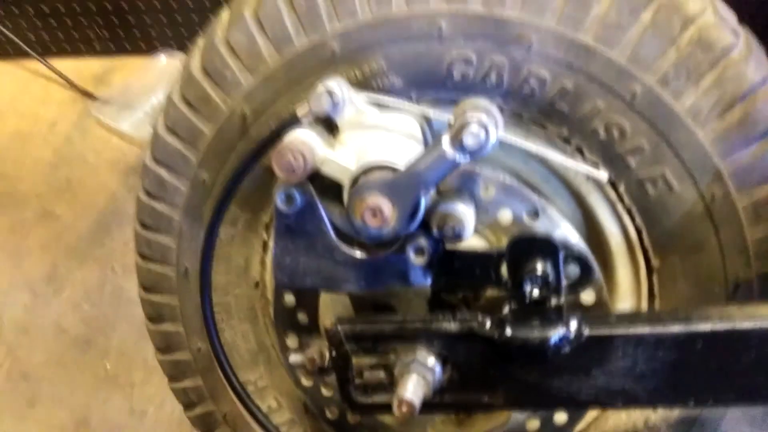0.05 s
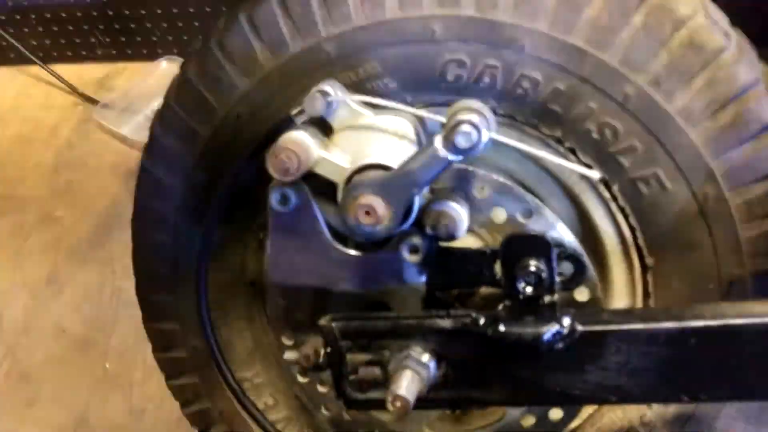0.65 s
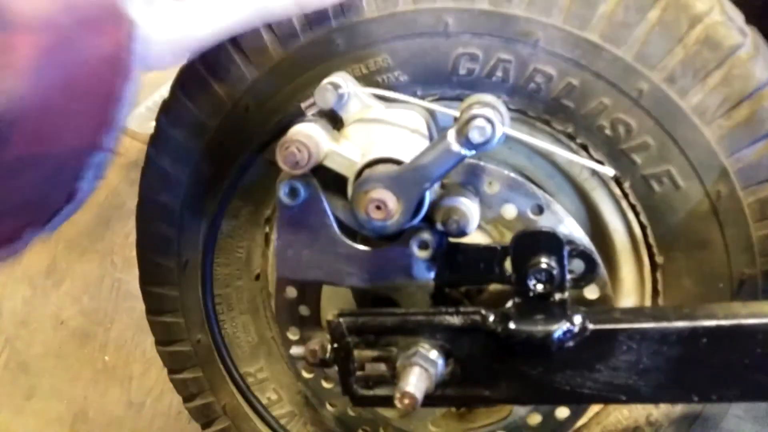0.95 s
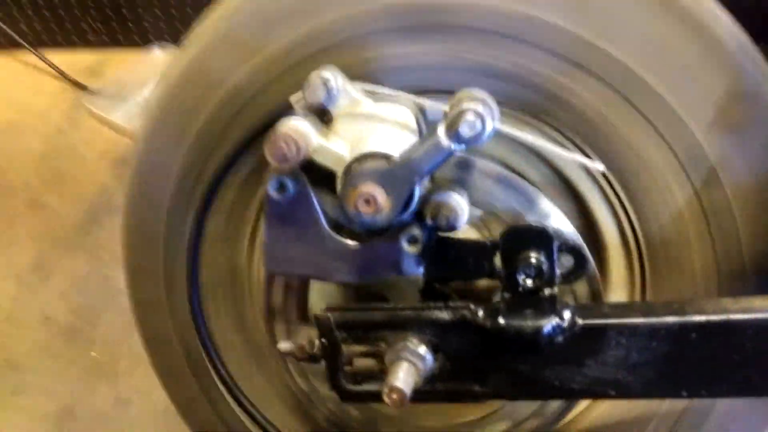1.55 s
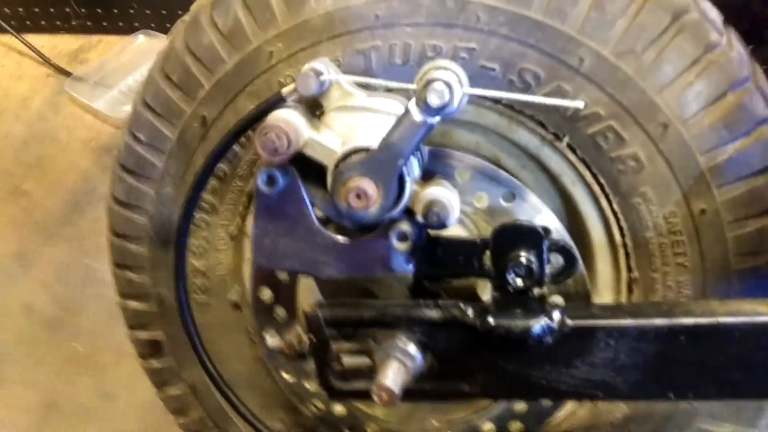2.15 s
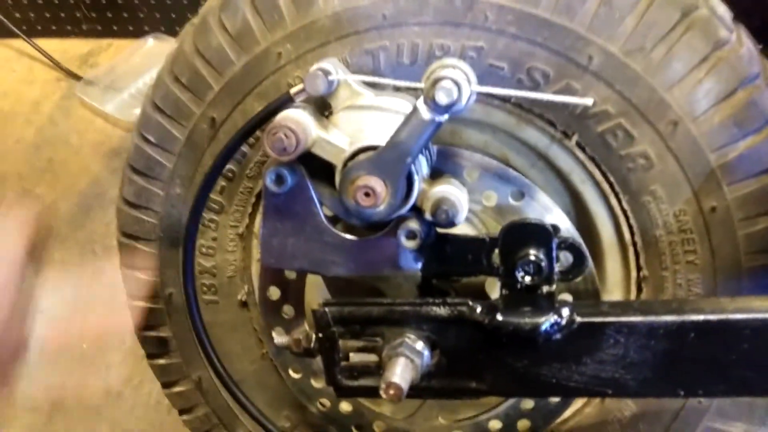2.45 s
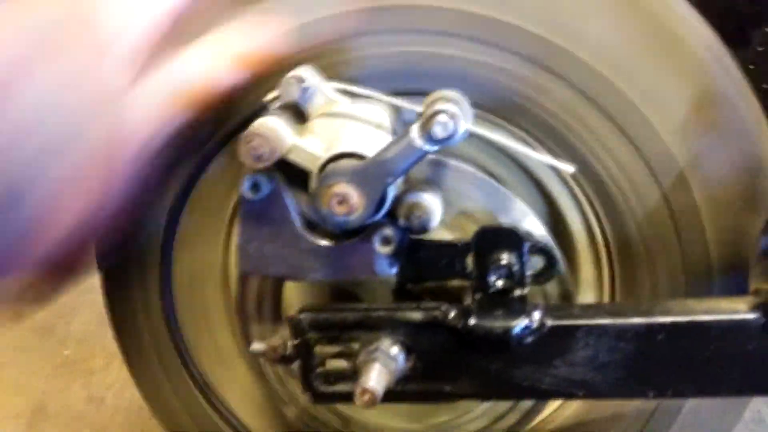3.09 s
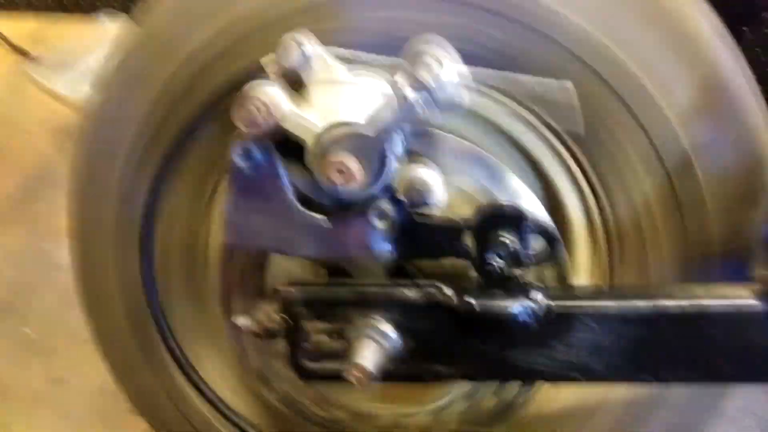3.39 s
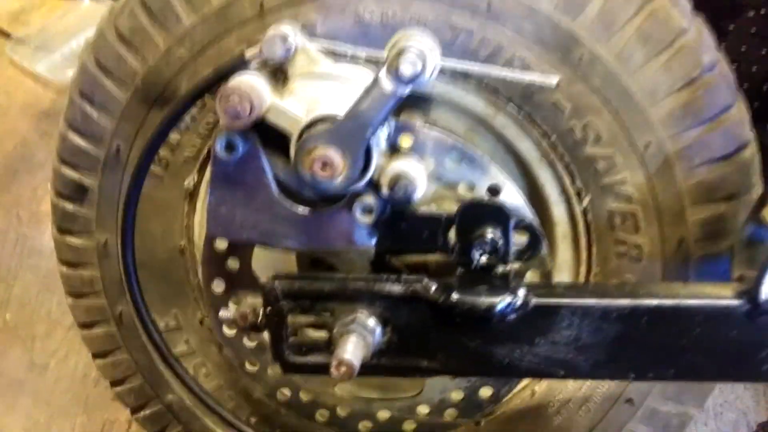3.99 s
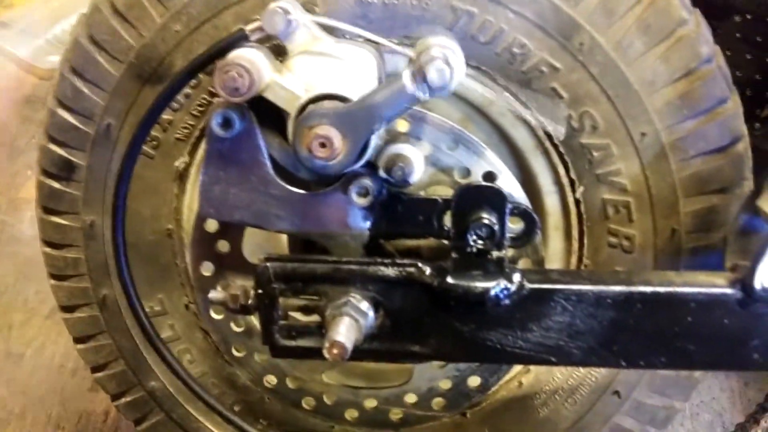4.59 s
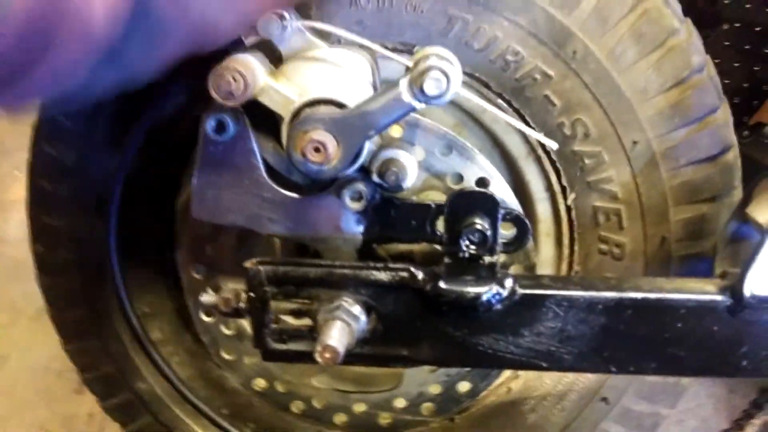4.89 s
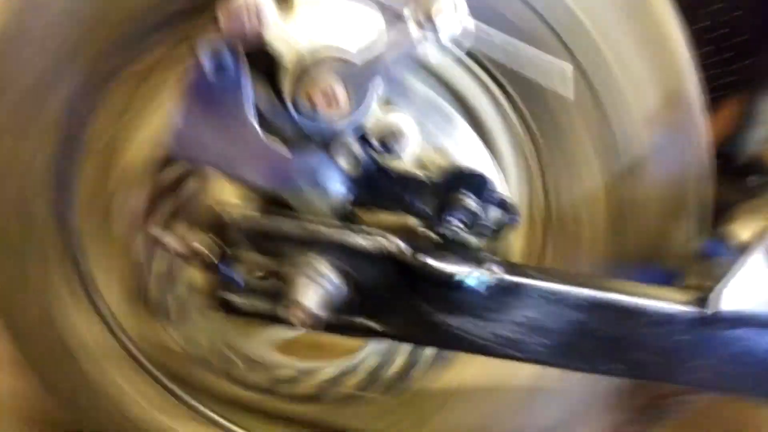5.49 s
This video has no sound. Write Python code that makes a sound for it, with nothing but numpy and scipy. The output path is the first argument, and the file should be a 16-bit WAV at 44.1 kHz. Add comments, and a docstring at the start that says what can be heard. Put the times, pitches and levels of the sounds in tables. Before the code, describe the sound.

Close up in a quiet workshop, a disc brake's loose metal lever clacks twice and ticks. A small wheel is spun by hand three times, its hub rolling softly while the steel disc brushes the pads with a thin ring. Dull knocks, hollow taps, short scuffs and sleeve swishes come in between. Near the end the caliper gives one hard, bright clank.

```python
"""A cable disc brake works on a small wheel, spun by hand three times in a workshop, near the microphone.
Impacts excite the metal's damped modes: the loose lever arm clacks and rattles, the caliper clanks once,
hard. Friction drives the steel disc, which brushes its pads and sings over the rolling hub.
Between these come dull knocks of the frame, hollow taps, scuffs on tyre and floor, and a sleeve's swish.
A short reverberation and quiet air lie behind them."""
import sys
import numpy as np
from scipy import signal
from scipy.io import wavfile
from scipy.ndimage import uniform_filter1d

SR = 44100
rng = np.random.default_rng(int(sys.argv[2]) if len(sys.argv) > 2 else 0)


def to_wav(s):
    """Save 16-bit WAV."""
    ch = np.atleast_2d(s).T  # columns
    pcm = np.round(np.clip(ch, -1, 1) * 32767)  # PCM
    wavfile.write(sys.argv[1], SR, pcm.astype(np.int16))


N = 248500
TIME = np.arange(N) / SR
HIT_TIME = TIME[:SR // 3]
LN_1000 = np.log(1000)  # amplitude decay of 60 dB, in nepers

# The lever arm hits its stop: start_s, level_db, rebound_s, tilt_db_per_octave, ring_db
LEVER_CLACKS = [(.6338, -26, .0047, 1.5, 8.5), (.7708, -36.5, .012, 6, 13.5)]
# Light metallic ticks, rung with the lever's modes: start_s, level_db, tilt_db_per_octave, ring_db
LEVER_TICKS = [(.6683, -46.5, 10, -6), (0.8188, -44.5, -1.5, 1), (.8394, -46, 15, -12), (.884, -52, 0, 9),
               (0.895, -49, 4, -10), (0.95, -52, 3, -1), (1.046, -52, 4.5, -4), (1.096, -51.5, -5.5, -2),
               (1.125, -55.5, 12, -5), (2.01, -47, 11, -14), (3.311, -40, 4.5, -1), (4.294, -55.5, 1, -19)]
# Distinct modes of the lever: pitch_hz, level_db, base_t60_s
LEVER_MODES = [(312, -19, .1), (845, -18, .13), (1290, -11, .1), (1400, -7, .1), (1475, -7, .12),
               (1750, -9, .1), (1798, 4, .07), (1850, -6, .07), (2088, -7, .1), (2196, -11, .1),
               (2368, -5, .1), (2565, -12, .12), (3127, -14, .1), (3180, -14, .1), (3350, -14, .12),
               (3830, -13, .1), (3967, -13, .1), (4130, -11, .11), (4382, -4, .08), (4746, -7, .12),
               (4266, -12, .08), (5114, -16, .09)]
# Spectrum of its dense, short-lived modes: frequency_hz, density_db
LEVER_SPECTRUM = [(60, -33), (170, -27), (280, -0.5), (520, -11), (800, -0.5), (1050, -3.5), (1450, 2),
                  (1900, -1), (2900, -4), (3550, -4.5), (4400, -6.5), (6000, -13.5), (8000, -15.5),
                  (10500, -28), (15500, -29)]


def lever_arm(tick_contact_s=.0052):
    """Impact across a clearance: the loose arm strikes its stop, rebounds and rattles."""
    clacks = rebounds(LEVER_CLACKS, count=2, contact_share=.55, softening=.83,
                      level_step_db=.5, tilt_step_db=-3, ring_step_db=-.5)
    ticks = [(s, db, tick_contact_s, tilt_db, ring_db) for s, db, tilt_db, ring_db in LEVER_TICKS]
    return strikes(clacks + lead_in_clicks(LEVER_CLACKS) + ticks, LEVER_SPECTRUM, LEVER_MODES,
                   grain_db=2.5, damping=1.84, rattle_db=-26, rattle_s=.065, blur_hz=11)


# The caliper slams against its bracket: start_s, level_db, rebound_s, tilt_db_per_octave, ring_db
CALIPER_CLANKS = [(5.355, -25, .0065, 1, 8)]
# Distinct modes of the caliper: pitch_hz, level_db, base_t60_s
CALIPER_MODES = [(742, -1, .16), (1125, -10, .12), (1609, -14, .12), (1860, -10, .08), (2046, -6, .13),
                 (2115, 0, .12), (4130, -14, .18), (4700, -11, .15), (5182, -8, .1), (5334, -5, .15),
                 (5679, -9, .17), (6400, -13, .11), (6917, -3, .12), (7307, -3, .14), (7477, -6, .19),
                 (7850, -1, .14), (8053, -11, .12), (8146, -7, .15), (9275, -6, .09), (9404, -8, .09),
                 (9776, -7, .12), (9974, -2, .11), (10740, -12, .12), (11272, -13, .1), (13662, -10, .09),
                 (13883, -13, .09)]
# Spectrum of its dense, short-lived modes: frequency_hz, density_db
CALIPER_SPECTRUM = [(60, -30), (160, -17), (250, -13.5), (520, -12), (760, -0.5), (1300, -6.5), (2050, 6.5),
                    (2700, -17), (3500, -11.5), (5000, -1.5), (6200, -7), (7700, -7.5), (11000, -9),
                    (15500, -16)]


def caliper_clank():
    """Inelastic rebound: the caliper lands three times, each slower blow staying longer in contact."""
    clanks = rebounds(CALIPER_CLANKS, count=3, contact_share=.29, softening=1.55,
                      level_step_db=-.14, tilt_step_db=-.18, ring_step_db=-2)
    return strikes(clanks + lead_in_clicks(CALIPER_CLANKS), CALIPER_SPECTRUM, CALIPER_MODES,
                   grain_db=5, damping=1.7, rattle_db=-36, rattle_s=.012, blur_hz=19)


# The disc catches on a pad: start_s, level_db, tilt_db_per_octave, ring_db
DISC_CATCHES = [(1.43, -49, 1.5, -5), (1.532, -49, 9, 9.5), (3.404, -50.5, 7, 12), (3.542, -36.5, -2, -15),
                (3.563, -39, -1, -15), (3.692, -54, -1, -10), (5.314, -58, 2, 8.5), (5.492, -50.5, 5.5, 6)]
# Distinct modes of the steel disc: pitch_hz, level_db, base_t60_s
DISC_MODES = [(1614, -7, .15), (2928, -3, .42), (3294, -11, .15), (3811, -10, .15), (4242, -4, .15),
              (4350, -6, .12), (5361, -7, .2), (5700, -3, .22), (5964, -13, .15), (6700, -8, .1),
              (6772, -1, .16), (7428, -11, .25), (8400, -12, .1), (8990, -9, .1), (9280, 1, .17),
              (9400, -5, .08), (9905, -13, .1), (10740, -11, .09), (11300, -13, .07), (11455, -9, .08),
              (12338, -13, .1), (12850, -16, .08), (13199, -14, .1), (13720, -9, .08), (14650, -14, .08)]
# Spectrum of its dense, short-lived modes: frequency_hz, density_db
DISC_SPECTRUM = [(300, -26.5), (1500, -8), (4000, 1), (6500, 0), (7800, -2), (9400, 0.5), (10400, -1),
                 (11300, -0.5), (13700, -7), (15800, -6.5)]


def disc_pings(contact_s=.0036):
    """Free vibration of a plate: a brief catch on a pad leaves the disc ringing."""
    catches = [(s, db, contact_s, tilt_db, ring_db) for s, db, tilt_db, ring_db in DISC_CATCHES]
    return strikes(catches, DISC_SPECTRUM, DISC_MODES,
                   grain_db=7, damping=1.33, rattle_db=-29, rattle_s=.012, blur_hz=30.8)


def disc_friction(pressure, firm_db=-47, damping=1.8):
    """Forced vibration: friction at the pads makes a brushing noise and drives the disc's resonances."""
    brush = colour(grit(N, grain_db=4.5, grain_s=.0015) * pressure, DISC_SPECTRUM)
    drive = grit(N, grain_db=5.3, grain_s=.006) * pressure
    sing = np.zeros(N)
    total = np.linalg.norm([amp(db) for _, db, _ in DISC_MODES])
    for hz, db, t60 in DISC_MODES:
        treble_bias = np.clip(.091 * np.log2(hz / 4000), -.5, .4)
        touch = (pressure / amp(firm_db) + 1e-6) ** -treble_bias  # a light touch favours high modes
        turn = unit(amp(7 * np.tanh(wander(per_s=20))))  # modes take turns as the contact point moves
        pole = np.exp((2j * np.pi * hz - LN_1000 * damping / t60) / SR)
        input_gain = np.sqrt(2 - 2 * abs(pole) ** 2)
        mode = signal.lfilter([input_gain], [1, -pole], drive * touch * turn + 1e-12).real
        sing += amp(db) / total * mode
    return brush + sing


# The wheel runs after a push: start_s, hold_s, level_db
WHEEL_SPINS = [(1.304, 0.31, -61.5), (3.087, 0.53, -55), (5.134, 0.71, -56)]
# The warped disc presses on the pads, about once a turn: start_s, hold_s, level_db, release_s
PAD_RUBS = [(1.388, 0.049, -69, 0.011), (1.51, 0.28, -71, .05), (3.08, 0.092, -57.5, 0.01),
            (3.4, 0.14, -48.5, 0.062), (5.163, 0.051, -46, 0.011), (5.497, 0.026, -51.5, 0.058)]
# Rolling noise of the hub: frequency_hz, density_db
HUB_SPECTRUM = [(100, -34.5), (240, -1.5), (480, -6), (640, -6.5), (810, 6.5), (1000, -2), (1400, -6.5),
                (1620, 3.5), (2200, -10), (4000, -34), (8000, -49)]


def spinning_wheel(drag_db=-3.5):
    """Rolling and sliding contact: the hub rolls while the pads drag lightly, harder at the warp."""
    rolling = sum(amp(db) * held(s, hold_s, attack_s=.089, release_s=.16)
                  for s, hold_s, db in WHEEL_SPINS)
    warp = sum(amp(db) * held(s, hold_s, attack_s=.013, release_s=release_s)
               for s, hold_s, db, release_s in PAD_RUBS)
    disc = disc_friction(pressure=amp(drag_db) * rolling + warp)
    hub = colour(grit(N, grain_db=2.9, grain_s=.0038) * rolling, HUB_SPECTRUM)
    return amp(-4) * disc + amp(-2) * hub


# Blows on the frame: start_s, level_db, rebound_s, tilt_db_per_octave, ring_db
FRAME_KNOCKS = [(2.022, -51.5, 0.0076, -7.5, -3), (2.074, -46.5, 0.0066, 3.5, -9.5),
                (2.644, -40, 0.0064, 3.5, -6), (3.181, -47, 0.0044, -8.5, -9.5),
                (3.271, -33.5, .01, -5, -14), (3.541, -35.5, 0.017, 3, 1.5), (3.696, -44, 0.01, -5.5, -16),
                (4.200, -38, .016, -1.5, -9), (4.510, -43.5, 0.008, -1, -1.5),
                (4.561, -37, 0.0086, 2.5, -12), (5.139, -35.5, 0.0098, 1, -2.5),
                (5.19, -41, 0.017, -1.5, -4)]
# Distinct modes of the frame: pitch_hz, level_db, base_t60_s
FRAME_MODES = [(247.7, -5.5, 0.23), (454, -5.5, 0.25), (474, -24, .1), (784, -28, .11), (806.5, 7.5, .11),
               (945, 1.5, 0.11), (1400, -17, 0.11), (1895, -8.5, 0.14)]
# Spectrum of its dense, short-lived modes: frequency_hz, density_db
FRAME_SPECTRUM = [(40, -30), (100, -28), (160, -25), (225, -5), (500, -7.5), (830, 2.5), (1150, -3.5),
                  (1700, -6), (2500, -19), (4500, -26.5), (9000, -42), (15000, -57)]


def frame_knocks():
    """Impact on a body with low modes: each blow and its weaker rebound sound dull."""
    knocks = rebounds(FRAME_KNOCKS, count=2, contact_share=.46, softening=1.36,
                      level_step_db=-3.5, tilt_step_db=2.5, ring_step_db=2)
    return strikes(knocks, FRAME_SPECTRUM, FRAME_MODES,
                   grain_db=-.5, damping=.76, rattle_db=-24, rattle_s=.012, blur_hz=6.8)


# Light hollow taps: time_s, level_db, pitch_hz
HOLLOW_TAPS = [(0.039, -43, 970), (1.014, -37.5, 741), (2.797, -36.5, 905), (3.074, -38, 820),
               (3.140, -38, 830), (3.162, -34, 366), (4.717, -45, 800), (4.752, -41, 815),
               (4.867, -34, 854)]


def hollow_taps(gain_db=-4, rise_s=.00219, knock_db=-7):
    """Heavily damped oscillation: a soft tap gives only a few cycles of a hollow note."""
    out, t = np.zeros(N), HIT_TIME
    envelope = (t / rise_s * np.exp(1 - t / rise_s)) ** 2
    for s, db, hz in HOLLOW_TAPS:
        note = np.sin(2 * np.pi * hz * t)
        knock = amp(knock_db) * colour(rng.standard_normal(len(t)), FRAME_SPECTRUM)
        add(out, s - rise_s / 2, amp(db + gain_db) * (note + knock) * envelope)
    return out


# Scuffs on tyre and floor: peak_s, level_db, width_s, tilt_db_per_octave
SCUFF_STROKES = [(1.42, -52.5, 0.054, -4.5), (2.019, -42.5, 0.058, 2), (2.643, -47.5, .065, -.5),
                 (3.14, -54, .14, 1), (3.37, -43.5, .11, 0.5), (3.577, -44.5, .075, -5),
                 (4.566, -46, .07, 1.5), (5.184, -40.5, 0.047, -2.5), (5.474, -46, 0.097, -1)]
# Their rubbing noise: frequency_hz, density_db
SCUFF_SPECTRUM = [(47, -92), (80, -38.5), (747, -5), (852, -7), (993, 3.5), (1080, -6.5), (1320, 2.5),
                  (1610, -14), (1870, -4), (2330, -13.5), (2490, -7.5), (3460, -19), (15000, -41.5)]


def scuffs():
    """Sliding friction: short rubs on tyre and floor give bursts of midrange noise."""
    return strokes(SCUFF_STROKES, SCUFF_SPECTRUM, rise_share=.56, grain_db=0, grain_s=.0027)


# Passes of the sleeve: peak_s, level_db, width_s
SLEEVE_PASSES = [(0.208, -64, 0.25), (2.679, -58, 0.095), (2.794, -58.5, 0.045), (2.88, -62.5, 0.053),
                 (3.021, -53.5, 0.041), (3.176, -52.5, 0.058), (4.776, -55.5, 0.081), (4.949, -53.5, 0.085)]
# Rubbing noise of the cloth: frequency_hz, density_db
SLEEVE_SPECTRUM = [(240, -22), (400, -6.5), (791, 2), (1590, -4.5), (1740, -4.5), (4130, -6.5), (6710, -12),
                   (9230, -11), (15000, -24)]


def sleeve_swishes(tilt_db=1.94):
    """Friction of cloth: every pass gives broadband noise of the same shape and colour."""
    passes = [(s, db, width_s, tilt_db) for s, db, width_s in SLEEVE_PASSES]
    return strokes(passes, SLEEVE_SPECTRUM, rise_share=.48, grain_db=1, grain_s=.002)


# Reverberation time of the workshop: frequency_hz, t60_s
ROOM_DECAY = [(150, 0.5), (800, 0.26), (2500, 0.15), (7000, 0.15), (15000, 0.069)]


def workshop_reverb(x, build_s=.0091):
    """Diffuse reverberation: reflections build up quickly and die soonest in the treble."""
    t = HIT_TIME
    hz, when, bands = signal.stft(rng.standard_normal(len(t)), SR, nperseg=256)
    decay = np.exp(-LN_1000 * when / read(ROOM_DECAY, hz)[:, None])
    tail = signal.istft(bands * decay, SR, nperseg=256)[1][:len(t)]
    tail *= 1 - np.exp(-(t / build_s) ** 2)
    return signal.fftconvolve(x, tail / np.linalg.norm(tail))[:N]


# Background noise of the room: frequency_hz, density_db
AIR_SPECTRUM = [(15, -79), (25, -28), (107, -22.5), (179, -16), (361, -5), (500, -5), (620, -4), (672, -2),
                (729, -2.5), (857, -4.5), (1280, -5), (1430, -7.5), (2460, -9.5), (2660, -11), (15800, -22)]


def room_air(level_db=-62):
    """Stationary noise: the room's air is a faint, steady hush."""
    return amp(level_db) * colour(rng.standard_normal(N), AIR_SPECTRUM)


def strikes(rows, spectrum, modes, grain_db, damping, rattle_db, rattle_s, blur_hz):
    """Modal superposition: parts chatter as they meet, then each mode rings with t60 = base / damping."""
    out, t = np.zeros(N), HIT_TIME
    hz, mode_db, t60 = np.transpose(modes)[:, :, None]
    decay = np.exp(-LN_1000 * t * damping / t60)
    for s, db, contact_s, tilt_db, ring_db in rows:
        progress = t / contact_s
        onset = 1 - np.exp(-2 * progress)
        blow = np.sqrt(2 * progress) * np.exp(.5 - progress)
        rattle = amp(rattle_db) * onset * np.exp(-t / rattle_s)
        chatter = colour(grit(len(t), grain_db, grain_s=.0004) * (blow + rattle), spectrum, tilt_db)
        weight = amp(mode_db + tilt_db * np.log2(hz))  # a harder blow favours the high modes
        phase = 2 * np.pi * rng.random(hz.shape)  # every blow lands on another spot
        # play in the joints blurs the notes: a random walk of phase
        drift = np.cumsum(rng.standard_normal(len(t))) * np.sqrt(2 * np.pi * blur_hz / SR)
        drift = uniform_filter1d(drift, size=120) * rng.choice([-1, 1], hz.shape)
        ring = (weight * decay * np.sin(2 * np.pi * hz * t + phase + drift)).sum(0)
        add(out, s, amp(db) * (chatter + amp(ring_db) * onset * ring / np.linalg.norm(weight)))
    return out


def rebounds(rows, count, contact_share, softening, level_step_db, tilt_step_db, ring_step_db):
    """Repeated impact: each hit lands count times, stepping in strength, contact time and colour."""
    return [(s + k * gap_s, db + k * level_step_db, contact_share * gap_s * softening ** k,
             tilt_db + k * tilt_step_db, ring_db + k * ring_step_db)
            for s, db, gap_s, tilt_db, ring_db in rows for k in range(count)]


def lead_in_clicks(rows, lead_s=.0034, softer_db=15, width_s=.0014, ring_db=-10):
    """A faint, short click sounds about 3 ms before each loud hit."""
    return [(s - lead_s, db - softer_db, width_s, tilt_db, ring_db) for s, db, _, tilt_db, _ in rows]


def strokes(rows, spectrum, rise_share, grain_db, grain_s):
    """Friction noise: each stroke swells and fades exponentially, brighter for a higher tilt."""
    out = np.zeros(N)
    for s, db, width_s, tilt_db in rows:
        swell = held(s, 0, attack_s=rise_share * width_s, release_s=(1 - rise_share) * width_s)
        heard = np.flatnonzero(swell > .003)
        friction = grit(len(heard), grain_db, grain_s) * swell[heard]
        add(out, TIME[heard[0]], amp(db) * colour(friction, spectrum, tilt_db))
    return out


def grit(count, grain_db, grain_s):
    """Stick-slip noise: as surfaces catch and slip, the strength jumps from grain to grain."""
    grain = (TIME[:count] / grain_s).astype(int)
    noise = rng.standard_normal(count)
    strength = amp(grain_db * rng.standard_normal(count).clip(-2, 2))
    return unit(noise * strength[grain])


def colour(x, spectrum, tilt_db=0, size=4096):
    """Minimum-phase filtering at unit power: the spectrum, tilted by tilt_db an octave above 500 Hz."""
    hz = abs(np.fft.fftfreq(size, 1 / SR))
    gain = unit(amp(read(spectrum, hz) + tilt_db * np.log2(np.maximum(hz, 500))))
    log_response = signal.hilbert(np.log(gain + 1e-5)).conj()
    impulse = np.fft.ifft(np.exp(log_response)).real
    return signal.fftconvolve(x, impulse[:size // 2])[:len(x)]


def held(s, hold_s, attack_s, release_s):
    """Exponential envelope: it rises until s, holds, and dies away."""
    return np.exp(-np.maximum(s - TIME, 0) / attack_s - np.maximum(TIME - s - hold_s, 0) / release_s)


def wander(per_s):
    """Random modulation: straight lines join per_s random values a second."""
    knots = np.arange(0, TIME[-1] + 1, 1 / per_s)
    return np.interp(TIME, knots, rng.standard_normal(len(knots)))


def read(points, hz):
    """Interpolation of a table along a logarithmic frequency axis."""
    table_hz, value = np.transpose(points)
    return np.interp(np.log(hz + 1), np.log(table_hz + 1), value)


def amp(db):
    """Amplitude ratio of a level in decibels."""
    return 10 ** (np.asarray(db) / 20)


def unit(x):
    """Normalisation to an rms of one."""
    return x / np.sqrt(np.mean(x ** 2) + 1e-20)


def add(mix, s, sound):
    """Superposition of a sound on the mix at time s."""
    part = mix[max(round(s * SR), 0):][:len(sound)]
    part += sound[:len(part)]


def scene():
    """Direct and reverberant fields add: brake, frame and handling sound over the room's quiet air."""
    metal = lever_arm() + caliper_clank() + disc_pings() + spinning_wheel()
    dull = frame_knocks() + hollow_taps()
    rubbing = scuffs() + sleeve_swishes()
    reverb = workshop_reverb(amp(-10) * metal + amp(-15) * dull + amp(-12) * rubbing)
    return (metal + dull + rubbing + reverb + room_air())[None]


def record(dry):
    """Band limiting: the small microphone loses the bass, and the recorder cuts the highest treble."""
    low_hz, high_hz = 110, 15800
    highpass = signal.butter(1, low_hz, "highpass", fs=SR, output="sos")
    lowpass = signal.firwin(511, high_hz, window=("kaiser", 9), fs=SR)
    return signal.oaconvolve(signal.sosfilt(highpass, dry), lowpass[None], "same")


dry = scene()
out = record(dry)
to_wav(out)
```